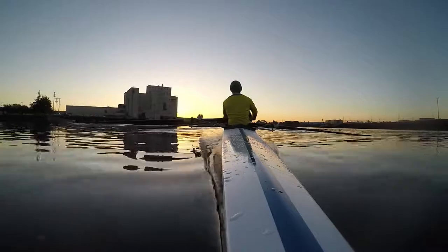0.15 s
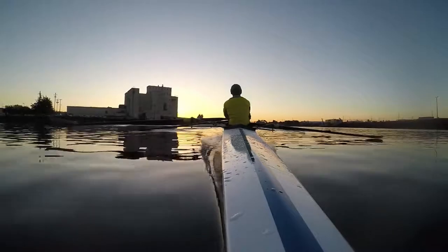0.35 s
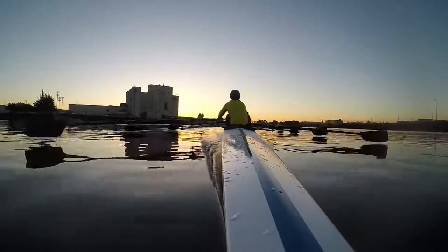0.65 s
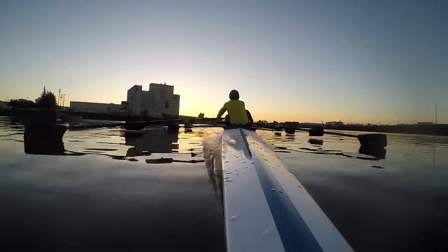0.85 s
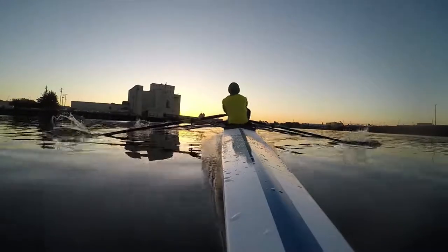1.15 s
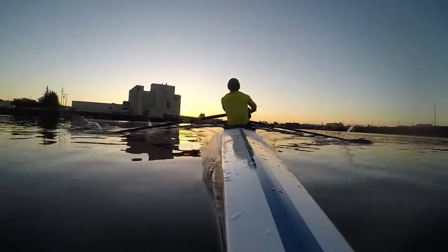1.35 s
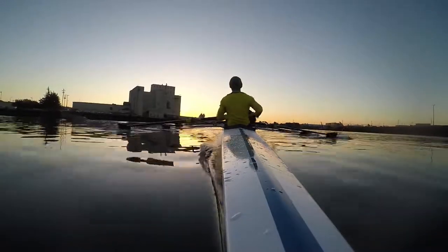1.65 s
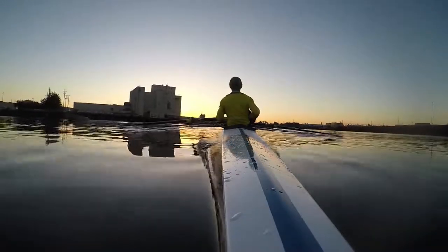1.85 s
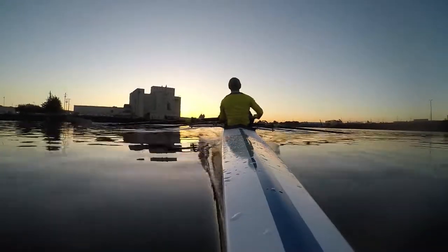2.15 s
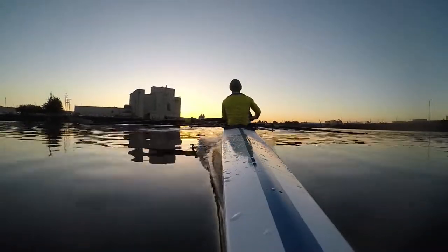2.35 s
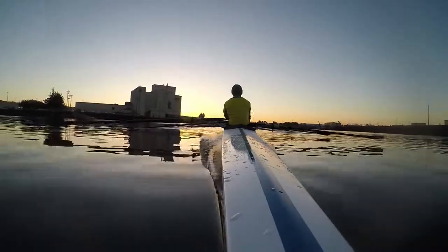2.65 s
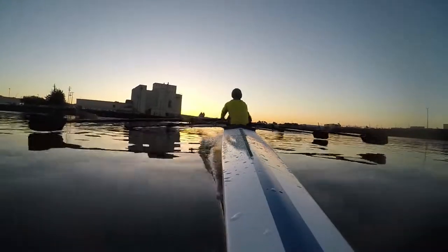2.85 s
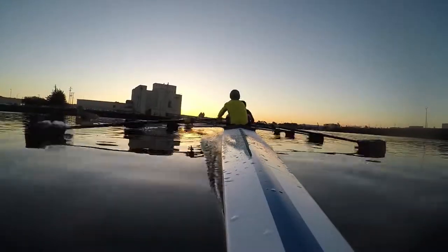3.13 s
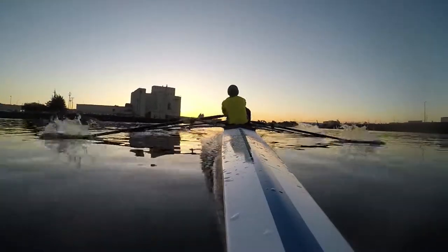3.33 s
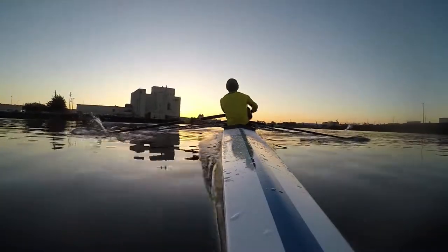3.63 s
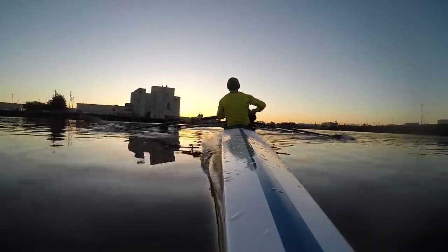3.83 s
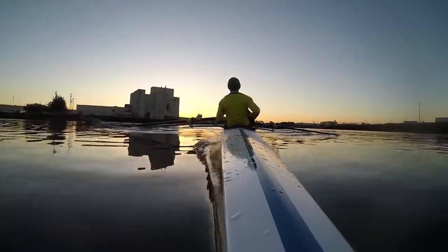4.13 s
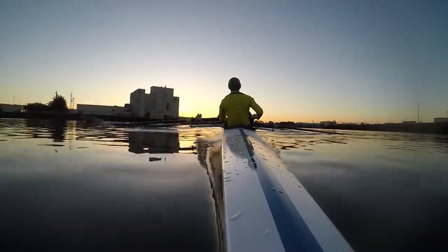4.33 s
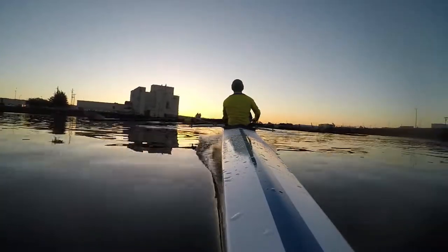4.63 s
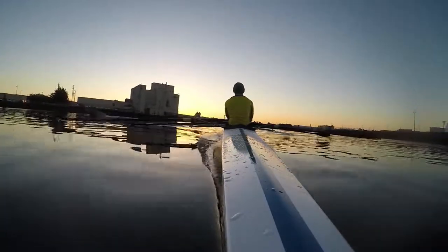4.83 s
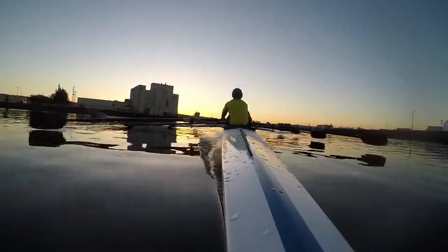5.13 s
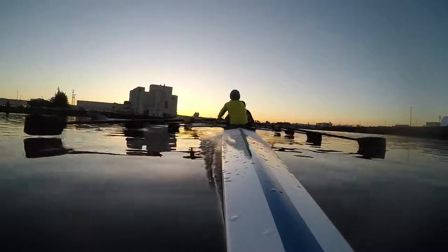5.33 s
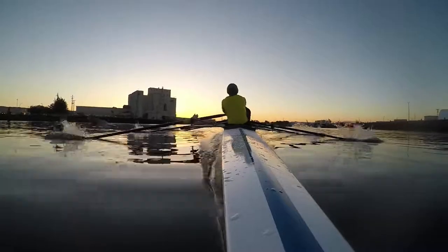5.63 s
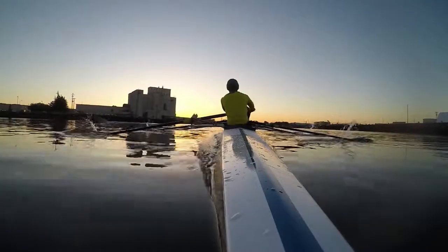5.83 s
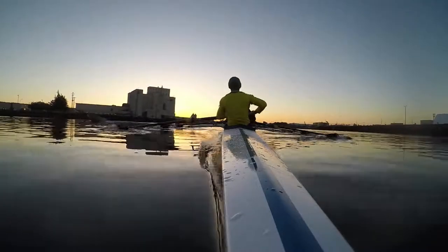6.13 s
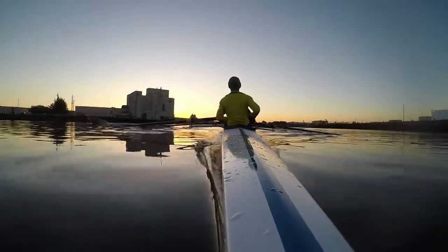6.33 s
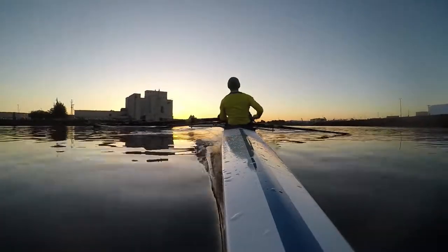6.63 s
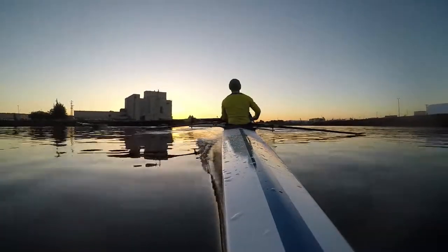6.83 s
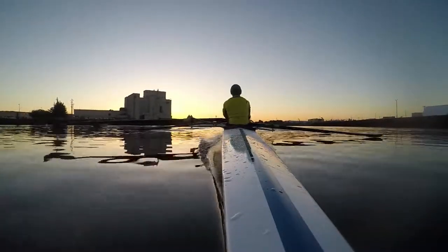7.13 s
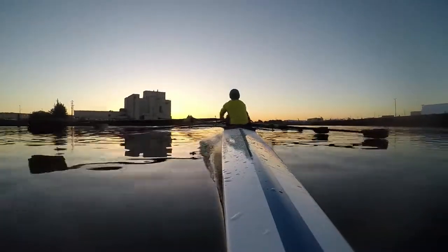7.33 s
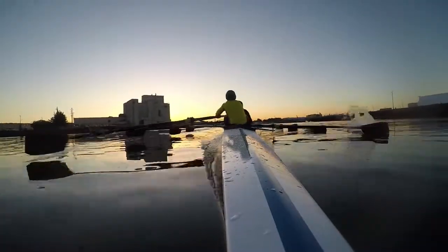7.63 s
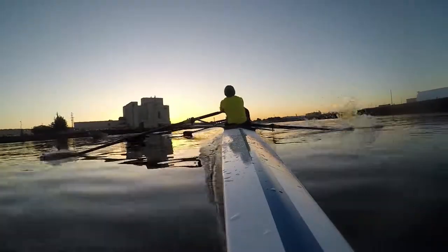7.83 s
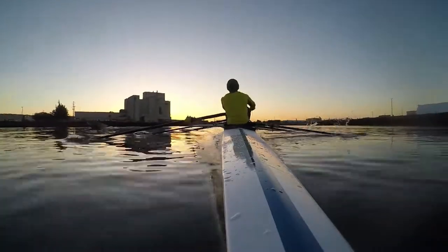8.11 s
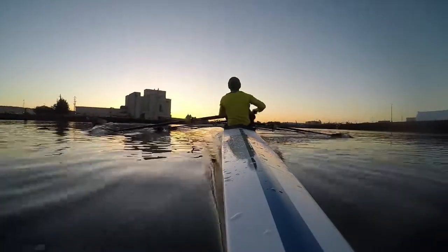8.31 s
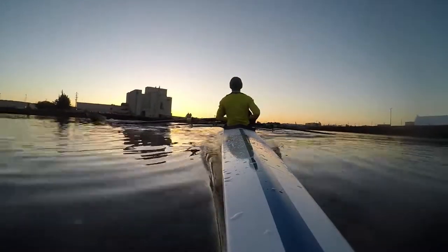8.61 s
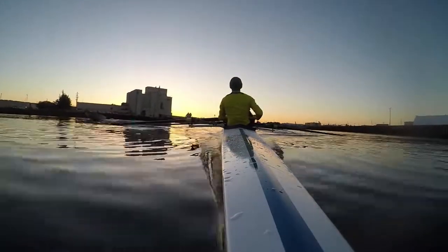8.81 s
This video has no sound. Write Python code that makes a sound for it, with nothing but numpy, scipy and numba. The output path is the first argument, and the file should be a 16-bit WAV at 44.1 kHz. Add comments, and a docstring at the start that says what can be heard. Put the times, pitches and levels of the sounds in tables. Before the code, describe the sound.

Heard from a sealed microphone on the deck of a rowing shell: water rushes and bubbles steadily along the side. About every 2.3 seconds the seat rolls with a growing woody rumble, dull hollow knocks cluster around the catch, then oarlocks clunk and water swishes at the release. Close drips tick and plop, and deep wind flutters unevenly over everything.

```python
"""A single scull glides over calm water, heard by one microphone sealed in a case on the deck.
Close by, the seat and oarlocks rumble and knock: noise and soft blows ring the modes of the hollow hull.
Along the side, water rushes as shaped noise and bubbles as rising sines; drops tick as noise bursts.
Wind buffets the case as deep, gusting noise, and two faint sine tones hum from afar."""
import sys
import numpy as np
from scipy import signal
from scipy.fft import rfft, irfft
from scipy.io import wavfile
from scipy.ndimage import uniform_filter1d
from numba import njit

SR = 44100
rng = np.random.default_rng(int(sys.argv[2]) if len(sys.argv) > 2 else 0)


def elevation(decibels):
    """Turn decibel levels (scalar or array-like) into linear amplitude ratios."""
    levels = np.asarray(decibels, float)
    return 10 ** (levels / 20)


def wav_record(signal):
    """Record a signal, one row per channel, as 16-bit PCM in the file named by sys.argv[1]."""
    frames = np.transpose(np.atleast_2d(signal))
    bounded = np.clip(frames, -1, 1)
    # unit amplitude maps onto the largest positive 16-bit level
    quanta = np.round(bounded * 32767).astype(np.int16)
    wavfile.write(sys.argv[1], SR, quanta)


N = 395577

# Modes of the hollow hull. Each row: pitch in Hz, relative level in dB, undamped 60 dB decay in seconds.
HULL_MODES = [(120, -1, 0.055), (172, 2.5, 0.094), (207, 1, 0.085), (263, -6.5, 0.066), (320, 3.5, 0.11),
              (361.5, 3, 0.12), (398, 3, 0.097), (438, -2.5, 0.063), (479, -4.5, 0.087)]


def level(x):
    """Scale to rms 1."""
    return x / np.sqrt(np.mean(x ** 2))


def colour(x, points):
    """Shape the spectrum of x by (Hz, dB) points, joined along log frequency."""
    hz, db = np.transpose(points)
    f = np.maximum(np.arange(N // 2 + 1) * SR / N, 1)
    gain_db = np.interp(np.log(f), np.log(hz), db)
    return irfft(rfft(x) * elevation(gain_db), N)


def band(x, lo_hz, hi_hz):
    """Band-pass between two frequencies."""
    edges_hz = [lo_hz, min(hi_hz, SR / 2.2)]
    return signal.sosfilt(signal.butter(2, edges_hz, "bandpass", fs=SR, output="sos"), x)


def ring(x, hz, t60):
    """One decaying mode driven by x; a unit impulse rings with amplitude 1."""
    pole = np.exp(2j * np.pi * hz / SR - np.log(1000) / (t60 * SR))
    return signal.lfilter([1], [1, -pole], x).imag


def walk(rate):
    """Random levels held 1 / rate seconds, smoothed twice, with rms near 1."""
    hold = int(SR / rate)
    steps = np.repeat(rng.standard_normal(N // hold + 1), hold)
    return level(uniform_filter1d(uniform_filter1d(steps, hold), hold))[:N]


def swell(times, rise_s, fall_s, strength):
    """A bell-shaped rise to each moment and a bell-shaped fall after it."""
    lag = np.arange(N) / SR - np.asarray(times)[:, None]
    bells = np.exp(-(lag / np.where(lag < 0, rise_s, fall_s)) ** 2)
    return (bells * np.reshape(strength, (-1, 1))).sum(axis=0)


@njit
def grains(n, start, step, fade, glide, size):
    """Bubbles: decaying sines that rise in pitch, each followed until it is 300 times weaker."""
    y = np.zeros(n)
    for k in range(len(start)):
        phase, w, a, i = 0., step[k], size[k], start[k]
        while a > size[k] / 300 and i < n:
            y[i] += a * np.sin(phase)
            phase, w, a, i = phase + w, w * glide[k], a * fade[k], i + 1
    return y


def bubbles(s, hz, size, cycles, rise):
    """Each bubble fades by 1/e in the given cycles and rises meanwhile by the given share."""
    span = cycles * SR / hz  # samples
    start = (s * SR).astype(np.int64)
    return grains(N, start, 2 * np.pi * hz / SR, np.exp(-1 / span), (1 + rise) ** (1 / span), size)


def hum():
    """Faint distant sine tones whose level comes and goes and whose phase wavers."""
    # Each row: pitch in Hz, middle amplitude in dB.
    tones = [(987, -45), (1184, -47.5)]
    t = np.arange(N) / SR
    return sum(elevation(db + 2.0 * walk(3.0)) * np.sin(2 * np.pi * hz * t + 0.8 * walk(9)) for hz, db in tones)


def wind(db, flutter_db):
    """Turbulence on the case: deep noise in short gusts, which also sways the mount at its own pitch."""
    # Spectrum of the buffeting. Each row: frequency in Hz, relative level in dB.
    buffet_points = [(8.8, -37), (15, -11.5), (43, 5.5), (64, 3), (113, -22.5), (173, -9.5), (258, -21.5),
                     (300, -16.5), (390, -51), (660, -120)]
    sway = elevation(-2.5) * level(ring(rng.standard_normal(N), 60.0, 0.19))
    flutter = elevation(flutter_db + 2.0 * walk(25)) * level(band(rng.standard_normal(N), 70.4, 127.2))
    gusting = elevation(db + 1.57 * walk(18))
    buffet = level(colour(rng.standard_normal(N), buffet_points))
    return gusting * (buffet + sway + flutter)


def water(wash_db, spray_db, spatter_db):
    """Small bubbles burst in flurries over a smooth rush; wash, spray and spatter rule low, middle and top."""
    # Water as heard through the case. Each row: frequency in Hz, relative level in dB.
    stream_points = [(150, -34.5), (250, -6), (397, -9), (578, -10.5), (722, -9.5), (1180, -17),
                     (1340, -22.5), (1820, -19.5), (3090, -30.5), (4130, -32.5), (4890, -34), (5610, -32),
                     (12300, -69), (14100, -69), (14900, -86.5)]
    moment, pitch, chance = rng.random((30000, 3)).T
    hz = 400 * 32 ** pitch
    size = (1.03 - chance) ** -.5 * np.sqrt(hz)  # few large, many small
    fizz = bubbles(moment * N / SR, hz, size, 2.0 + 0.0021 * hz, 0.016)
    flurries = elevation(-3.0 + 1.7 * walk(40)) * level(fizz)
    stream = colour(rng.standard_normal(N) + flurries, stream_points)
    # three neighbouring parts, split near 1600 and 7800 Hz, each brought to rms 1
    spectrum, f = rfft(stream), np.arange(N // 2 + 1) * SR / N
    below, under_top = 1 / (1 + (f / 1600) ** 3), 1 / (1 + (f / 7800) ** 12)
    weights = (below, under_top - below, 1 - under_top)
    low, mid, top = (level(irfft(spectrum * weight, N)) for weight in weights)
    wash = elevation(wash_db + 1.46 * walk(14)) * low
    spray = elevation(spray_db + 0.24 * walk(25)) * mid
    spatter = elevation(spatter_db + 1.0 * walk(34)) * top
    return wash + spray + spatter


def plips(surge):
    """Small single bubbles pop along the side as rising sines, loudest while the boat surges."""
    per_s, base_db, lo_hz, octaves = 110, -33.5, 1402, 0.9
    moment, pitch, chance = rng.random((int(per_s * N / SR), 3)).T
    hz = lo_hz * 2 ** (octaves * pitch)
    size = elevation(base_db - 3.8 * np.log(1.02 - chance))
    return (0.27 + surge) * bubbles(moment * N / SR, hz, size, np.full(len(hz), 4.5), 0.03)


def slaps():
    """Ripples thump the bow at random; each gives the hull one soft, short push."""
    per_s, base_db, half_length_s = 18, -20.5, 0.004
    moment, chance = rng.random((int(per_s * N / SR), 2)).T
    hits = np.zeros(N)
    hits[(moment * N).astype(int)] = elevation(base_db - 2.9 * np.log(1.02 - chance))
    pushes = np.convolve(hits, np.hanning(int(2 * half_length_s * SR)))[:N]
    return -band(pushes, 70, 700)


def patter(slide):
    """Many lesser drops click on the deck as noise bursts, loudest while the seat slides."""
    per_s, base_db, spread_db = 90, -37.5, 3.5
    moment, chance = rng.random((int(per_s * N / SR), 2)).T
    hits = np.zeros(N)
    hits[(moment * N).astype(int)] = elevation(base_db - spread_db * np.log(1.08 - chance))
    decay = np.exp(-1 / (.003 * SR))  # 3 ms
    bursts = signal.lfilter([1], [1, -decay], hits) * rng.standard_normal(N)
    clicks = colour(bursts, [(900, -20.0), (2000, 4.0), (5600, -6.5), (9000, -27.0), (14000, -47.5)])
    return (0.3 + slide) * clicks


def drops():
    """Drops near the case tick as noise bursts of a few ms; plops are single large bubbles."""
    # Each row: start in seconds, level in dB, gain of the bright upper band in dB.
    tick_rows = [(0.46, -35, -20), (0.5118, -17.5, -29), (0.5344, -27, -9.5), (0.655, -16, -31.5),
                 (0.697, -20.5, -30), (0.763, -17.5, -38), (0.885, -22.5, -35), (2.189, -24.5, -32),
                 (3.066, -19.5, -30), (3.134, -25, -24), (4.617, -17.5, -26), (4.929, -18.5, -27),
                 (5.072, -26.5, -10), (5.1794, -29, -29), (5.366, -29, -16), (5.629, -33, -19.5),
                 (6.2078, -19, -32), (6.322, -10, -33.5), (7.25, -18, -33), (7.3354, -33, -27),
                 (7.655, -22.5, -29), (7.745, -28, -36), (7.9806, -19.5, -39)]
    # Each row: start in seconds, starting amplitude in dB, starting pitch in Hz.
    plop_rows = [(0.429, -20, 1770), (0.539, -24, 2150), (0.7387, -22.5, 1900), (0.754, -21, 2200),
                 (0.978, -24.5, 2050), (1.1049, -18, 2010), (1.2474, -20, 1650), (2.136, -23.5, 1680),
                 (2.7861, -20, 2200), (2.8394, -12.5, 1530), (2.9494, -19, 2100), (3.028, -21.5, 2200),
                 (3.18, -18.5, 2250), (3.2258, -22, 2200), (3.4331, -19, 1920), (4.056, -18.5, 3560),
                 (4.42, -26, 2780), (4.5101, -20.5, 2020), (5.0835, -19, 1590), (5.1377, -24, 1980),
                 (5.227, -21, 1670), (5.356, -21, 850), (5.5707, -19, 2120), (6.2764, -20, 1880),
                 (6.322, -15, 1860), (7.2954, -20, 2260), (7.436, -21, 2240), (7.5125, -18.5, 2090),
                 (7.809, -18.5, 2240), (7.9109, -24.5, 2480), (7.934, -18.5, 775), (8.515, -17, 965)]
    tick_s = 0.0033
    out, t = np.zeros(N), np.arange(2048) / SR
    for s, db, bright_db in tick_rows:
        burst = rng.standard_normal(len(t)) * np.sqrt(2 * t / tick_s) * np.exp(-t / tick_s)
        tick = band(burst, 2300, 5500) + elevation(bright_db) * band(burst, 5500, 13500)
        i = int(s * SR)
        out[i:i + len(t)] += elevation(db) * tick[:N - i]
    s, db, hz = np.transpose(plop_rows)
    return out + bubbles(s, hz, elevation(db), np.full(len(s), 5.0), 0.042)


def swish(release):
    """Water pours off the blades as they leave: band-passed noise that follows the release."""
    flow = level(band(rng.standard_normal(N), 750, 2100))
    return elevation(-31.5 + 2.5 * walk(30)) * release ** 1.7 * flow


def roll(low_db, seat_db):
    """Wheels and lapping water shake the hull modes with noise in uneven lumps."""
    rail_hz, db_per_octave = 395, 14  # the seat rails shake mostly the modes near this pitch
    low_shake = elevation(3.5 * walk(45) + low_db)
    seat_shake = elevation(2.5 * walk(45) + seat_db)
    out = np.zeros(N)
    for hz, db, t60 in HULL_MODES:
        off_rail_db = -db_per_octave * abs(np.log2(hz / rail_hz))
        shake = low_shake if hz < 250 else seat_shake * elevation(off_rail_db)
        even = np.sqrt(4 * np.log(1000) / (t60 * SR))  # evens out the power of long and short rings
        out += elevation(db) * even * ring(shake * rng.standard_normal(N), hz, t60)
    return out


def knocks():
    """Blows swell in a few ms and ring the modes near their place, more modes when damped, under a crack."""
    # Each row: start in seconds, peak of the ringing body in dB, pitch that the struck place favours in Hz,
    # gain of the sharp crack over the body in dB.
    blows = [(0.396, -6.5, 170, -16), (0.497, -13, 186, -6), (0.592, -3.5, 192, -3.5),
             (0.734, -13, 392, -20), (0.764, -4.5, 374, -11), (0.796, -4, 398, -21), (0.922, -3, 388, -21),
             (0.945, -13, 383, -7), (0.978, -15.5, 362, -20), (1.082, -4.5, 400, -16),
             (1.651, -2, 201, -13), (1.699, -4.5, 200, -11), (1.748, -5, 334, -10.5),
             (1.816, -11.5, 390, -3), (1.859, -11.5, 345, 0), (2.177, -4.5, 201, -8),
             (2.393, -14.5, 320, -1), (2.52, -6, 213, -15), (2.601, -4.5, 125, -15), (2.621, -7, 450, -1),
             (2.633, -4, 247, -4.5), (2.683, -15, 395, -22), (2.73, -11.5, 374, -9), (2.815, -13, 395, -16),
             (2.84, -13, 352, -16), (2.904, -16, 395, -21), (2.939, -18, 395, -9), (3.083, -9, 385, -11),
             (3.105, -6, 423, -4.5), (3.12, -5, 441, -15), (3.246, -9, 431, -16), (3.28, -8.5, 425, -7),
             (3.3, -9, 175, -18), (3.742, -7, 120, -4), (3.94, -13, 300, -1), (3.974, -11, 207, -4),
             (3.978, -10, 348, 5.5), (4.002, -9.5, 372, -10), (4.068, -13.5, 367, -3.5),
             (4.244, -13, 342, -11), (4.31, -1.5, 140.3, -17), (4.407, -11, 150, -5.5),
             (4.451, -11, 198, 1), (4.567, -10, 352, -6.5), (4.665, -8.5, 253, -5.5),
             (4.747, -11.5, 350, -2), (4.783, -10.5, 320, -4), (4.836, -13, 347, -12),
             (4.997, -11.5, 382, -5), (5.065, -15, 403, -17), (5.228, -3.5, 403, -21.5),
             (5.281, -2, 410, -16.5), (5.314, -7.5, 353, -16), (5.342, -9, 396, -19), (5.389, -9, 386, -21),
             (5.414, -5.5, 387, -12), (5.529, -6, 372, -6.5), (5.553, -7, 407, -5.5), (5.56, -9, 184, -22),
             (5.593, -8, 175, -24), (5.621, -14, 189, -12), (6.204, -14, 326, -3), (6.235, -9, 333, 0.5),
             (6.259, -12, 312, -5), (6.358, -4.5, 175, -30), (6.374, -10.5, 418, -11),
             (6.712, -6.5, 200, -7), (6.808, -12, 444, -1.5), (6.875, -13, 365, -6), (6.937, -13, 259, -8),
             (7.01, -14.5, 290, -1), (7.071, -10, 164, -17), (7.188, -8.5, 400, -4), (7.22, -10.5, 210, -9),
             (7.134, -12, 330, -14), (7.294, -7, 347, -2.5), (7.36, -9.5, 175, -12),
             (7.563, -5, 410, -17.5), (7.624, -5, 403, -16.5), (7.664, -3, 405, -18), (7.697, -9, 378, -15),
             (7.805, -18.5, 447, -16), (7.85, -10.5, 410, -7), (7.89, -8, 373, -6), (8.406, -7, 172, -4),
             (8.45, -15, 175, -12), (8.503, -14, 360, -10), (8.519, -17, 400, 9), (8.53, -11.5, 205, -9),
             (8.584, -7, 329, -12), (8.626, -9, 400, -11), (8.749, -16, 374, -19)]
    swell_s, hard_damping = 0.002, 0.72  # the harder the crack, the faster the body swells and dies
    push_s, push_db = 0.0023, 5  # each crack also holds one short push
    out, t = np.zeros(N + SR), np.arange(SR // 4) / SR
    hz, db, t60 = np.transpose(HULL_MODES)[:, :, None]
    for s, peak_db, place_hz, crack_db in blows:
        # water and body damp the low places most
        place_damping = 1.815 - 0.3 * np.log2(place_hz / 200)
        damping = place_damping * (0.86 + hard_damping * elevation(crack_db))
        share = elevation(db) * np.exp(-(np.log(hz / place_hz) / (.045 * damping ** 1.5)) ** 2)
        modes = share * np.sin(2 * np.pi * hz * t) * 1000. ** (-t * max(damping, .3) / t60)
        onset = (1 - np.exp(-t / (swell_s * elevation(-0.4 * crack_db)))) ** 2
        body = onset * modes.sum(axis=0)
        crack = band(rng.standard_normal(len(t)) * np.exp(-t / 0.0097), 290, 1090)
        push = band(np.sin(np.pi * np.minimum(t / push_s, 1)), 110, 900)
        crack = crack + elevation(push_db) * push
        i = int(s * SR)
        out[i:i + len(t)] += elevation(peak_db) * (body / np.abs(body).max() + elevation(crack_db) * crack)
    return out[:N]


def scene():
    """The phases of the stroke raise and lower rumble and water; all layers meet at one microphone."""
    # Each row is a stroke: seat rolls fastest in seconds, roll strength 0-1, blades enter in seconds,
    # blades leave in seconds, release strength 0-1.
    strokes = [(0.85, 0.87, 1.1, 1.73, 0.92), (3.05, 0.96, 3.35, 4.0, 0.97), (5.3, 0.99, 5.6, 6.27, 0.99),
               (7.65, 0.9, 7.9, 8.5, 0.99)]
    # Each row: time in seconds, wind in dB, faster flutter in dB above the wind.
    gusts = [(0.0, -26, 8), (0.02, -21.5, -4), (0.95, -19, -9.5), (2.22, -13.5, -8.5), (2.25, -20, 0.5),
             (3.5, -19.5, -6.5), (3.72, -15.5, -11), (3.8, -25, -8), (4.0, -13.5, -13), (4.42, -14, 0),
             (4.55, -20, 5), (5.42, -16.5, -10), (6.07, -21, -7.5), (6.27, -14, -11), (6.75, -14, -4.5),
             (6.94, -22, 6), (7.59, -13.5, -3.5), (7.82, -18.5, -9.5), (8.42, -20.5, 2), (8.54, -13, -19.5),
             (8.97, -13.5, -13)]
    # Small waves slap the side. Each row: time in seconds, dB added to spray and spatter.
    splashes = [(0.21, 2), (0.53, 7), (0.66, -4), (0.76, 2), (2.19, 4), (2.64, 2), (2.8, 4), (2.95, 3.5),
                (3.13, 4.5), (3.43, 6), (4.06, 3.5), (4.931, 8.5), (5.08, 5.5), (5.2, 6.5), (5.37, 3),
                (5.43, 4), (5.62, 5), (6.33, 5.5), (7.26, 4.5), (7.34, 6.5), (7.461, 4.5), (7.98, 1.5)]
    # Each layer: dB at rest, then dB added by slide, surge, catch, release and settling.
    low_rumble, seat_roll = (-38.5, 4.5, 6.5, 6.5, 8, 8.5), (-47.5, 19, 0.5, 8, 1.5, 21.5)
    wash, spray, spatter = (-32.5, -3, 3, 2.5, 5.5, -4), (-39, 1.5, 1, 0.5, 1.5, 0), (-60.5, -0.5, 2, 5, 1, -3.5)

    t = np.arange(N) / SR
    slide_s, push, catch_s, leave_s, flick = np.transpose(strokes)
    slide = swell(slide_s, 0.69, 0.48, push)  # the seat gathers speed, then brakes
    surge = swell(slide_s - 0.23, 0.44, 0.38, 0.87)  # peaks just before the seat is fastest
    catch = swell(catch_s, 0.1, 0.4, 0.76)
    release = swell(leave_s, 0.14, 0.099, flick)
    settling = swell(leave_s + 0.032, 0.15, 0.27, flick)  # the hull shudders on after the release
    phases = np.array([np.ones(N), slide, surge, catch, release, settling])
    layers = np.array([low_rumble, seat_roll, wash, spray, spatter])
    low_db, seat_db, wash_db, spray_db, spatter_db = layers @ phases

    wash_db = wash_db - 0.7 * (t - t.mean())  # the wash fades by 0.7 dB per second
    splash_s, added_db = np.transpose(splashes)
    splash_db = swell(splash_s, 0.017, 0.019, added_db)
    gust_s, wind_db, flutter_db = np.transpose(gusts)
    air = hum() + wind(np.interp(t, gust_s, wind_db), np.interp(t, gust_s, flutter_db))
    stream = water(wash_db, spray_db + splash_db, spatter_db + splash_db)
    small_water = plips(surge) + slaps() + patter(slide) + drops() + swish(release)
    hull = roll(low_db, seat_db) + knocks()
    return (air + stream + small_water + hull)[None]


def top_cut(x):
    """Nothing passes above the cut-off."""
    return signal.sosfilt(signal.butter(12, 15020, fs=SR, output="sos"), x)


def record(dry):
    """Air pockets in the case lift two treble bands at the microphone; the loudest peaks are rounded."""
    # Each row: centre in Hz, width in Hz, lift in dB.
    air_pockets = [(4194, 940, 6), (5930, 880, 2.5)]
    f = np.arange(N // 2 + 1) * SR / N
    lift_db = sum(db / (1 + (2 * (f - hz) / width) ** 2) for hz, width, db in air_pockets)
    heard = irfft(rfft(dry) * elevation(lift_db), N)
    return top_cut(np.tanh(0.84 * heard) / 0.94)


dry = scene()
out = record(dry)
wav_record(out)
```